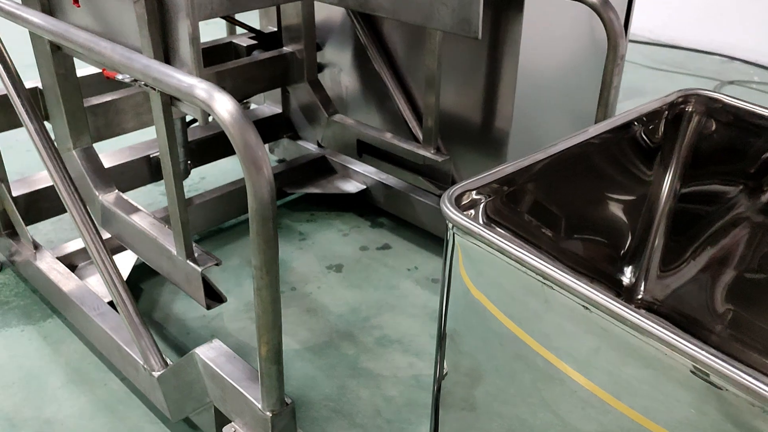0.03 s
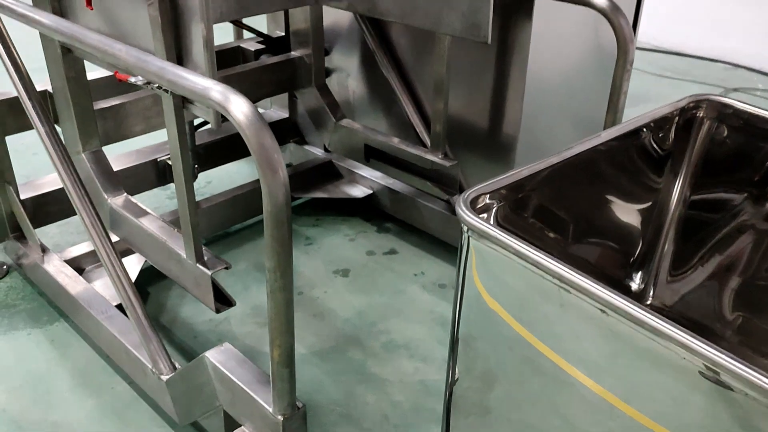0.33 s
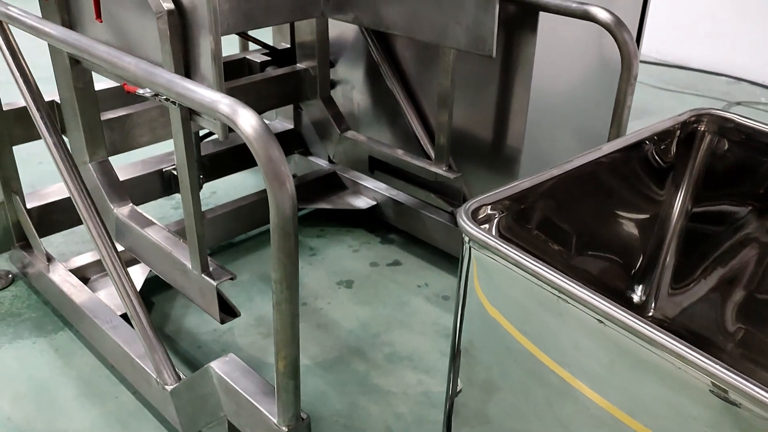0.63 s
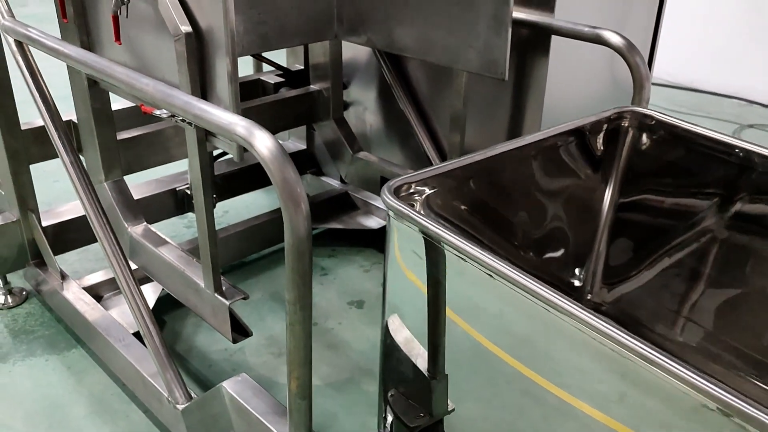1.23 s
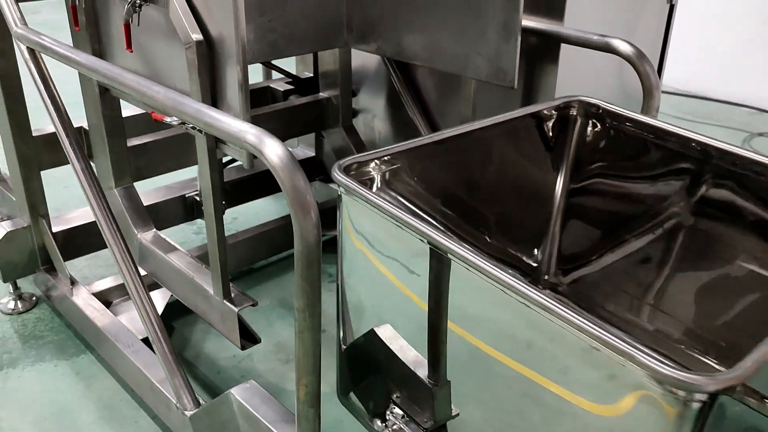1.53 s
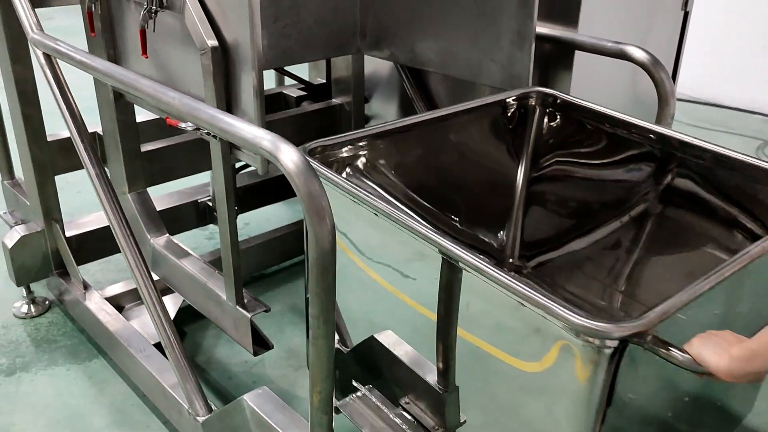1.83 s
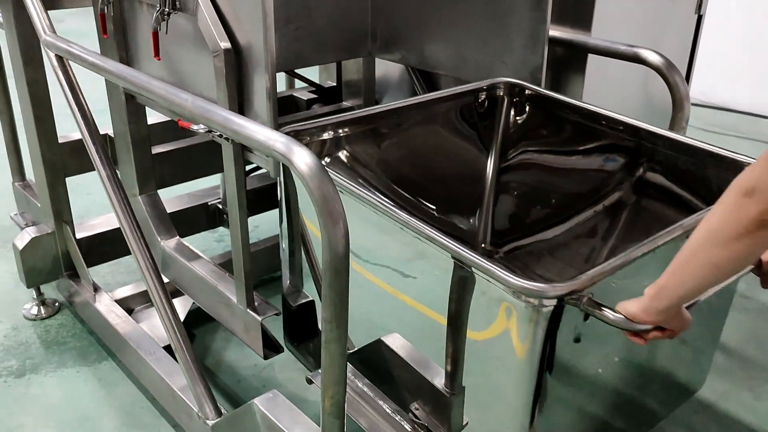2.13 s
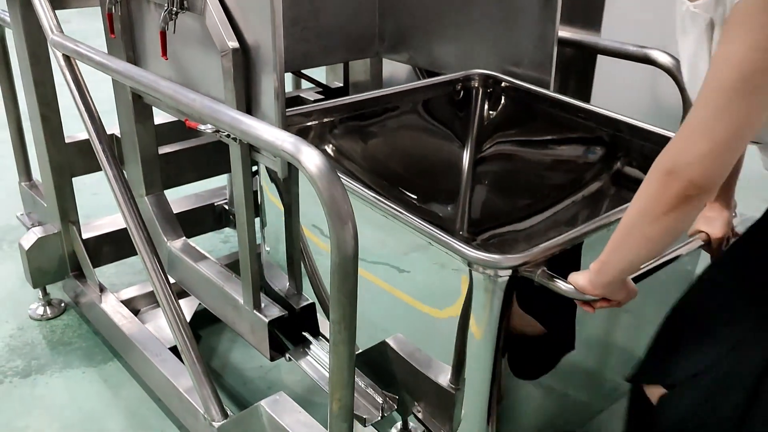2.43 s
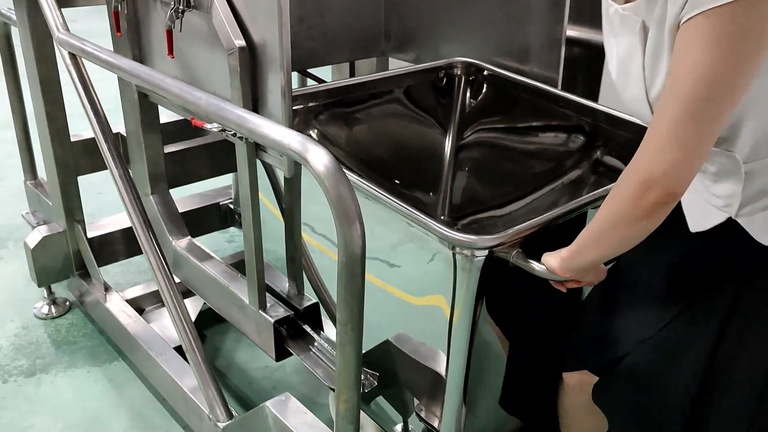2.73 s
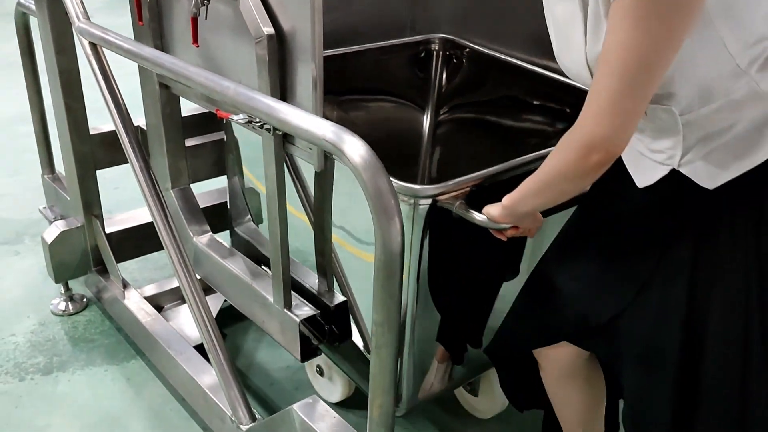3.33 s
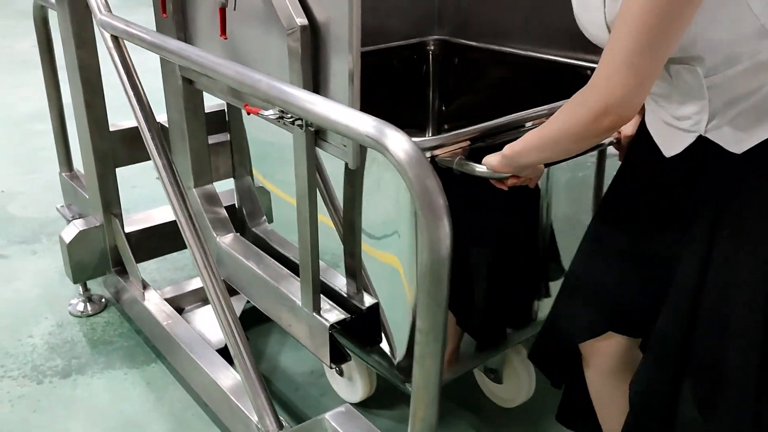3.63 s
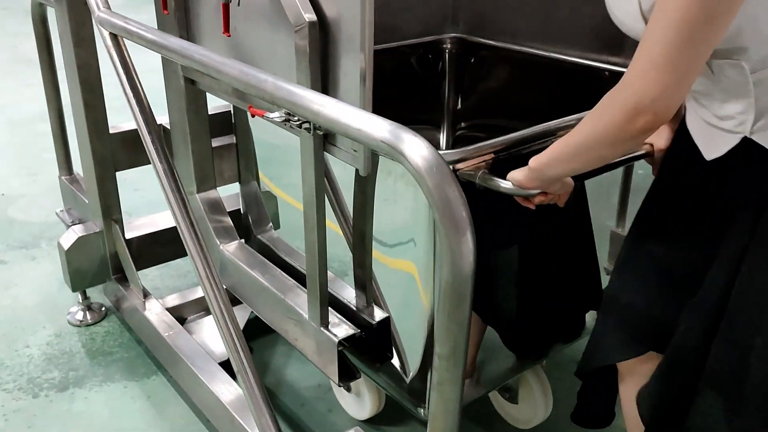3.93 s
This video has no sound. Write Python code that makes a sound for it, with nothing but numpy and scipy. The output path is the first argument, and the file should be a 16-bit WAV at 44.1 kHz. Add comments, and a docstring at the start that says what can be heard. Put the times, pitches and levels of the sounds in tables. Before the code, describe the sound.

An empty steel bin rolls softly over a smooth floor under faint factory hum. It bangs twice against a metal frame, then rumbles, booms and clatters along the guides, ringing in a hard, echoing hall.

```python
"""An empty stainless steel bin is wheeled over a smooth factory floor into the frame of a loader.
It rolls softly under the hum and air hiss of the hall, bangs twice against the frame near 2.7 s,
then rumbles and clatters along the guides. The wheels shake its broad panels into a low boom;
knocks and small blows ring its walls, and the hard hall answers."""
import sys
import numpy as np
from scipy import signal
from scipy.fft import rfft, irfft
from scipy.io import wavfile

SR = 44100
rng = np.random.default_rng(int(sys.argv[2]) if len(sys.argv) > 2 else 0)


def persist_wave(psi):
    """Save psi, clipped to +-1, as 16-bit WAV."""
    counts = np.round(np.clip(psi, -1, 1) * 32767).astype(np.int16)
    wavfile.write(sys.argv[1], SR, np.atleast_2d(counts).T)


N = 176400
T = np.arange(N) / SR

# left-right coherence: freq_hz, coherence (clipped to 1)
COHERENCE = [(60, 2), (130, .92), (290, 0.84), (640, 0.39), (1400, 0.03), (3100, 0), (15000, 0.01)]
# left minus right: freq_hz, difference_db
BALANCE_DB = [(100, -2), (250, -0.8), (1300, 0.5), (4400, 0.6), (8100, 3.5), (15000, -0.2)]
# hall air spectrum: freq_hz, relative_db
AIR_SPECTRUM = [(15, -22), (28, -4.5), (45, -1.5), (80, -9), (140, -7), (230, -10.5), (430, -11),
                (700, -14), (1020, -19.5), (2600, -19), (4800, -20.5), (5800, -24), (8200, -25.5),
                (9500, -35.5), (15500, -48)]
# hall air swell: time_s, level_db
AIR_ENVELOPE = [(0, -34), (.5, -34.5), (.85, -36), (1.28, -37), (1.55, -35), (1.9, -36), (2.35, -35),
                (2.6, -36), (4, -28)]
# machine hum: pitch_hz, level_db
HUM_TONES = [(613, -54), (744, -61), (959, -65)]
# wheel rumble: time_s, level_db
RUMBLE_ENVELOPE = [(0, -55.5), (1.4, -48), (1.9, -40), (2.2, -47.5), (2.62, -54), (2.73, -30), (2.9, -30.5),
                   (3.06, -28.5), (3.16, -31), (3.38, -18.5), (3.47, -17), (3.54, -17.5), (3.7, -19),
                   (3.83, -24.5), (3.9, -18), (4, -20)]
# rumble spectrum: freq_hz, relative_db
RUMBLE_SPECTRUM = [(25, -48), (55, -49), (80, 3), (120, 1.5), (165, 5.5), (215, -1.5), (265, -1), (305, 2),
                   (385, -4.5), (440, 0.5), (540, -10.5), (800, -24.5), (3000, -64)]
# rolling drone: time_s, level_db
DRONE_ENVELOPE = [(0, -51), (.4, -45.5), (.8, -45.5), (1.05, -37.5), (1.5, -43.5), (1.75, -46), (2.0, -42),
                  (2.3, -48), (2.7, -40), (4, -48)]
# panel boom: time_s, level_db
BOOM_ENVELOPE = [(0, -64), (.9, -48.5), (1.12, -40), (1.4, -50), (1.78, -35), (2.05, -43.5), (2.3, -70),
                 (2.6, -40), (2.7, -27), (2.92, -25.5), (3.08, -26), (3.2, -13), (3.28, -19.5),
                 (3.44, -19.5), (3.6, -28), (3.67, -28), (3.735, -12.5), (3.8, -28), (4, -30)]
# broad panel modes: pitch_hz, relative_db, width_hz
PANEL_MODES = [(97, -1.5, 5.2), (108.1, 0, 5)]
# bin wall modes: pitch_hz, relative_db, t60_s
WALL_MODES = [(166, -3, .6), (262, 0, .9), (307, -2, .7), (429, -7, .6), (445, -7, .6), (612, -3, .8),
              (641, 1, .9), (673, -2, 1.1), (720, -3, .8), (782, 2, 1.0), (805, -3, .7), (861, -4, .7),
              (988, -2, .9), (1101, -4, 1.0), (1144, -4, 1.0), (1232, -5, .9), (1507, -6, .6),
              (1765, -7, .7), (2283, -8, .7), (2568, -7, .5), (2865, -4, .5), (4318, -5, .4)]
# dense sheet-metal ring: freq_hz, t60_s
SHEET_DECAY = [(150, 0.84), (750, 0.36), (2000, 0.19), (7000, 0.16), (15000, 0.13)]
# hall reverberation: freq_hz, t60_s
HALL_DECAY = [(150, 3.7), (750, 1.6), (3000, 1.98), (8000, 1.38), (15000, 1.03)]
# knocks of bin, castors and frame: start_s, relative_db, tilt_db_per_octave, chatter_s, peak_hz
KNOCK_EVENTS = [(0.795, -20.5, 2.5, 0.011, 6000), (0.961, -17, 1.5, 0.0069, 6900),
                (1.533, -18, 1.5, 0.011, 4000), (1.562, -18, 0.5, 0.013, 3300),
                (1.729, -20, 1, 0.0092, 6800), (1.807, -26, 4.5, 0.0086, 6000), (2.638, 3, -1, 0.02, 1520),
                (2.693, 2.5, 3, .01, 4700), (2.718, 0.5, 0.5, 0.024, 745), (3.122, -3.5, -2, 0.007, 850),
                (3.289, -17, 7, 0.0099, 640), (3.42, -8, -2.5, 0.0072, 2300),
                (3.523, -4.5, 1.5, 0.0052, 4000), (3.549, -2.5, -3, 0.0062, 1770),
                (3.586, 1, 2, 0.0065, 8050), (3.608, -5.5, -3, .015, 2650), (3.68, 0.5, 3.5, 0.011, 4050),
                (3.694, -0.5, -2, 0.016, 2900), (3.845, 3, .5, 0.03, 4100), (3.892, -4, -3.5, 0.0092, 1730),
                (3.971, -0.5, -1.5, 0.0069, 3000)]
# knock spectrum: freq_hz, relative_db
KNOCK_SPECTRUM = [(40, -10), (110, 0), (250, -13), (500, -16), (750, 5), (1100, -3), (2000, 0), (3000, 0),
                  (4700, -2), (5700, -5), (8300, -4.5), (9800, -19.5), (15500, -25.5)]
# wheel scuffs: centre_s, width_s, level_db
SCUFF_EVENTS = [(1.63, .025, -42.5), (2.0, .07, -46.5), (2.25, 0.17, -48.5), (2.85, .035, -32),
                (3.29, .02, -25), (3.45, 0.069, -29), (3.61, 0.042, -24), (3.73, 0.017, -27.5),
                (3.9, 0.083, -29.5)]
# scuff spectrum: freq_hz, relative_db
SCUFF_SPECTRUM = [(500, -38), (3000, -14), (7500, 5), (10500, -4), (15500, -16)]
# wheel force on the guides: time_s, level_db
GRIND_ENVELOPE = [(2.62, -57), (2.66, -29), (2.78, -24.5), (2.87, -27), (2.98, -32), (3.06, -23.5),
                  (3.11, -18.5), (3.16, -15.5), (3.3, -17.5), (3.4, -18), (3.5, -20), (3.62, -20),
                  (3.73, -22.5), (3.82, -27.5), (3.89, -22), (4, -23.5)]
# grind spectrum: freq_hz, relative_db
GRIND_SPECTRUM = [(30, -43), (100, -25), (400, -15.5), (530, -4.5), (630, 3), (800, 0.5), (1200, -2),
                  (1500, -4.5), (2100, -6), (4600, -7.5), (5600, -10), (8100, -14), (9800, -25.5),
                  (15500, -34.5)]
# bin hitting the loader frame: start_s, level_db
FRAME_HITS = [(2.640, -29), (2.698, -22)]
# loader frame modes: pitch_hz, relative_db, t60_s
LOADER_MODES = [(262, -3, 1.6), (325, -8, 1.4), (676, -2, 1.3), (729, -2, .8), (785, 0, .8), (865, -3, .7),
                (1236, -7, 1.0), (1540, 0, .25), (2853, 0, .3), (4318, -1, .38), (4615, -1, .35),
                (4721, -4, .5), (5604, -3, .3), (8274, -5, .25)]


def amp(db):
    """Decibels to gain."""
    return 10 ** (np.asarray(db) / 20)


def unit(x):
    """Scale to rms 1."""
    return x / np.sqrt(np.mean(x ** 2) + 1e-20)


def bell(x, centre, width):
    """Gaussian, peak 1."""
    return np.exp(-.5 * ((x - centre) / width) ** 2)


def lookup(table, hz):
    """Interpolate over log frequency."""
    table_hz, values = np.transpose(table)
    return np.interp(np.log(hz + 1), np.log(table_hz + 1), values)


def envelope(table):
    """Gain over time from time_s, level_db rows."""
    return amp(np.interp(T, *np.transpose(table)))


def freqs_hz(size):
    """Real FFT bin frequencies."""
    return np.fft.rfftfreq(size, 1 / SR)


def colour(x, spectrum):
    """Causal filter, mean power gain 1."""
    hz = abs(np.fft.fftfreq(4096, 1 / SR))
    log_gain = np.log(unit(amp(lookup(spectrum, hz))))
    taps = np.fft.ifft(np.exp(np.conj(signal.hilbert(log_gain)))).real
    return signal.oaconvolve(x, taps[None], axes=1)[:, :x.shape[1]]


def diffuse(size):
    """Stereo white noise: coherent bass, independent treble."""
    left, other = rfft(rng.standard_normal((2, size)))
    coherence = np.clip(lookup(COHERENCE, freqs_hz(size)), -1, 1)
    right = coherence * left + np.sqrt(1 - coherence ** 2) * other
    return irfft(np.array([left, right]), size)


def noise(spectrum):
    """Coloured diffuse noise, rms 1."""
    return unit(colour(diffuse(N), spectrum))


def drift(width_hz):
    """Slow complex noise, rms 1."""
    white = rng.standard_normal(N) + 1j * rng.standard_normal(N)
    return unit(np.fft.ifft(white * bell(np.fft.fftfreq(N, 1 / SR), 0, width_hz)))


def hall_air():
    """Air hiss of the hall."""
    return noise(AIR_SPECTRUM) * envelope(AIR_ENVELOPE)


def machine_hum(waver_hz=3.125):
    """Machine tones, wavering in pitch."""
    out = np.zeros(N)
    for pitch_hz, level_db in HUM_TONES:
        hz = pitch_hz + waver_hz * drift(width_hz=3.24).real
        out += amp(level_db) * np.sqrt(2) * np.sin(2 * np.pi * np.cumsum(hz) / SR)
    return out


def cut_deep_bass(vibration, cutoff_hz=61):
    """Steep high-pass: the rumble and boom carry little deep bass."""
    return signal.sosfilt(signal.butter(4, cutoff_hz, "high", fs=SR, output="sos"), vibration)


def body_rumble():
    """The wheels shake the body."""
    return cut_deep_bass(noise(RUMBLE_SPECTRUM) * envelope(RUMBLE_ENVELOPE))


def resonance(pitch_hz, width_hz, steadiness=0.54):
    """Randomly shaken mode, swings compressed, rms 1."""
    shake = drift(width_hz)
    steadied = shake / (abs(shake) + 0.029) ** steadiness
    return unit((steadied * np.exp(2j * np.pi * pitch_hz * T)).real)


def rolling_drone():
    """Deep drone of the rolling bin."""
    return resonance(pitch_hz=47.8, width_hz=7.4) * envelope(DRONE_ENVELOPE)


def panel_boom():
    """Two close modes of the broad panels beat."""
    modes = sum(amp(db) * resonance(hz, width_hz) for hz, db, width_hz in PANEL_MODES)
    return cut_deep_bass(unit(modes) * envelope(BOOM_ENVELOPE))


def dense_ring(decay, rise_s):
    """Noise tail decaying per band, energy 1."""
    hz, time_s, bands = signal.stft(diffuse(SR), SR, nperseg=256)
    bands = bands * amp(-60 * time_s / lookup(decay, hz)[:, None])
    tail = signal.istft(bands, SR, nperseg=256)[1][:, :SR]
    attack = 1 - np.exp(-T[:SR] / rise_s)
    return unit(tail * attack) / np.sqrt(SR)


def modal_ring(modes):
    """Damped modes of a steel part, energy 1."""
    t, out = T[:SR], np.zeros((2, SR))
    for hz, db, t60_s in modes:
        spread_rad = np.arccos(np.clip(lookup(COHERENCE, hz), -1, 1))
        phase_rad = spread_rad * rng.choice([-.5, .5]) * np.array([[1], [-1]])
        decay = amp(db - 60 * t / t60_s)
        out += rng.choice([-1, 1]) * decay * np.sin(2 * np.pi * hz * t + phase_rad)
    return unit(out) / np.sqrt(SR)


def bin_response(force, spectrum, hall_db, modes_db):
    """A force excites sheet ring, hall and wall modes."""
    sheet = dense_ring(SHEET_DECAY, rise_s=0.00038)
    hall = amp(hall_db) * dense_ring(HALL_DECAY, rise_s=0.005)
    walls = amp(modes_db) * modal_ring(WALL_MODES)
    response = colour(sheet + hall, spectrum) + walls
    return signal.fftconvolve(force[None], response, axes=1)[:, :N]


def add(mix, start_s, sound):
    """Mix in place at start_s."""
    part = mix[:, round(start_s * SR):][:, :sound.shape[1]]
    part += sound[:, :part.shape[1]]


def clink(count=18, low_hz=1500, high_hz=8400, t60_s=.28):
    """High partials of a small struck steel part, energy 1."""
    partials_hz = low_hz + (high_hz - low_hz) * (np.arange(count) + rng.random(count)) / count
    return modal_ring([(hz, -3 * np.log2(max(hz / 4000, 1)), t60_s) for hz in partials_hz])


def mode_clusters_db(hz, depth_db=3, spacing_hz=110):
    """Each strike point favours its own clusters of sheet modes."""
    grid_hz = np.arange(512) * spacing_hz
    ripple = np.interp(hz, grid_hz, rng.uniform(-0.64, 1, len(grid_hz)))
    return depth_db * ripple * np.clip(hz / 1000 - .5, 0, 1)


def knocks(gain_db=10, contacts_per_s=3000, clink_ratio=.45, peak_db=5.5, peak_octaves=0.054):
    """Steel on steel: first contact, chatter and clink, coloured by strike point."""
    out, t = np.zeros((2, N)), T[:4096]
    for start_s, relative_db, tilt_db_per_octave, chatter_s, peak_hz in KNOCK_EVENTS:
        contacts = rng.standard_normal(len(t)) * (rng.random(len(t)) < contacts_per_s / SR)
        chatter = contacts * np.exp(-(t / chatter_s) ** 2)
        force = chatter / (np.linalg.norm(chatter) + 1e-9)
        force[0] += 0.33  # first contact
        hit = bin_response(force, KNOCK_SPECTRUM, hall_db=-4, modes_db=-27)
        add(hit, 0, clink_ratio * np.linalg.norm(hit[0]) * clink())
        hz = freqs_hz(hit.shape[1])
        tilt_db = tilt_db_per_octave * np.log2(np.clip(hz, 400, 9000) / 3000)
        boost_db = peak_db * bell(np.log2((hz + 1) / peak_hz), 0, peak_octaves)
        shaped = irfft(rfft(hit) * amp(tilt_db + boost_db + mode_clusters_db(hz)), hit.shape[1])
        add(out, start_s, amp(gain_db + relative_db) * shaped)
    return out


def wheel_scuffs():
    """Light, high rubbing in short swells."""
    swells = sum(amp(db) * bell(T, centre_s, width_s) for centre_s, width_s, db in SCUFF_EVENTS)
    return noise(SCUFF_SPECTRUM) * swells


def guide_grind(blows_per_s=800, spread_db=2, jerk_db=1.1, tails=3, cycle_hz=1.6):
    """Wheels grind along the guides in small, uneven blows; ring tails alternate for a smooth sound."""
    blows = rng.standard_normal(N) * amp(spread_db * np.minimum(rng.exponential(1, N), 4))
    blows *= rng.random(N) < blows_per_s / SR
    jerk = amp(jerk_db * unit(drift(width_hz=25).real))
    force = unit(blows * jerk) * envelope(GRIND_ENVELOPE)
    tail_index = np.floor(tails * cycle_hz * T + 2 * rng.random(N)) % tails
    return sum(bin_response(force * (tail_index == k), GRIND_SPECTRUM, hall_db=-7.5, modes_db=-3)
               for k in range(tails))


def frame_ring():
    """The loader frame rings on after each collision."""
    out = np.zeros((2, N))
    for start_s, level_db in FRAME_HITS:
        ring = modal_ring(LOADER_MODES)
        onset_rms = np.std(ring[:, :SR // 20])
        add(out, start_s, amp(level_db) * ring / onset_rms)
    return out


def wheel_groan(centre_s=3.488, width_s=.02, level_db=-16):
    """A wheel groans as it rides onto the guide."""
    return amp(level_db) * resonance(pitch_hz=292.6, width_hz=14) * bell(T, centre_s, width_s)


def scene():
    """Hall and bin; treble leans left, bass right."""
    hall = hall_air() + machine_hum()
    clatter = knocks() + frame_ring() + guide_grind()
    rolling = body_rumble() + panel_boom() + rolling_drone() + wheel_groan() + wheel_scuffs()
    balance = amp(lookup(BALANCE_DB, freqs_hz(2 * N)) * np.array([[.5], [-.5]]))
    return irfft(rfft(hall + clatter + rolling, 2 * N) * balance)[:, :N]


def record(dry):
    """Fade-in, soft clip, low-pass."""
    start_s, rise_s, start_gain, cutoff_hz = 0.079, 0.24, 0.12, 15800
    fade = 1 - (1 - start_gain) * np.exp(-np.maximum(T - start_s, 0) / rise_s)
    faded = dry * (T > start_s) * fade
    clipped = faded / (1 + faded ** 8) ** (1 / 8)
    lowpass = signal.firwin(511, cutoff_hz, window=("kaiser", 9), fs=SR)
    return signal.oaconvolve(clipped, lowpass[None], "same")


dry = scene()
out = record(dry)
persist_wave(out)
```